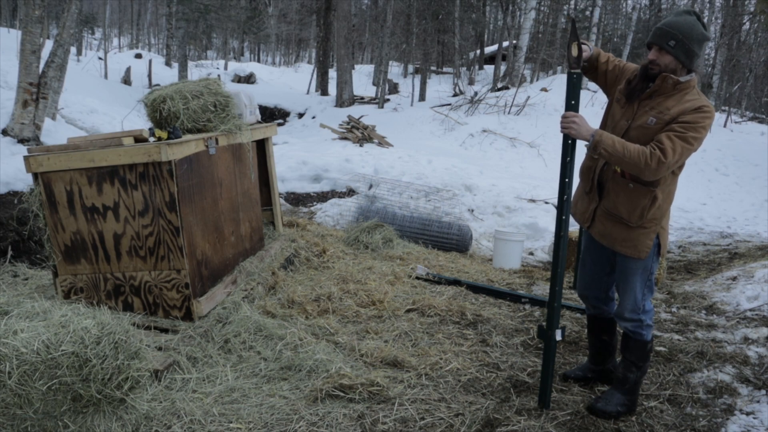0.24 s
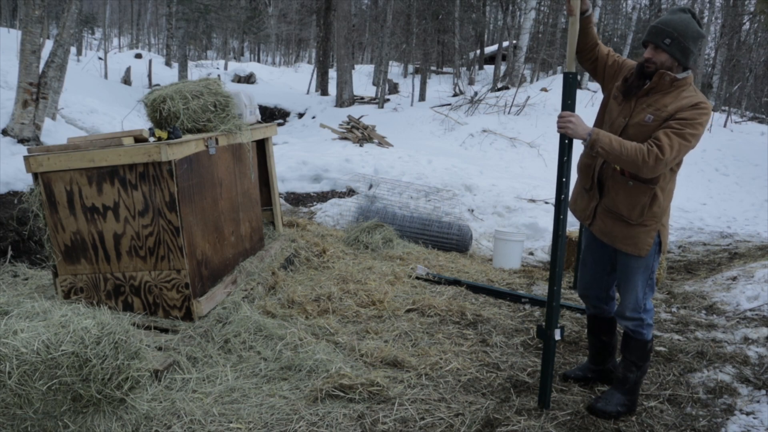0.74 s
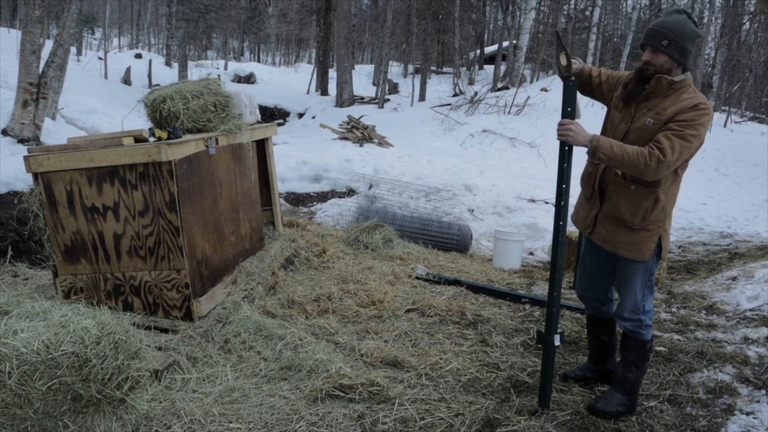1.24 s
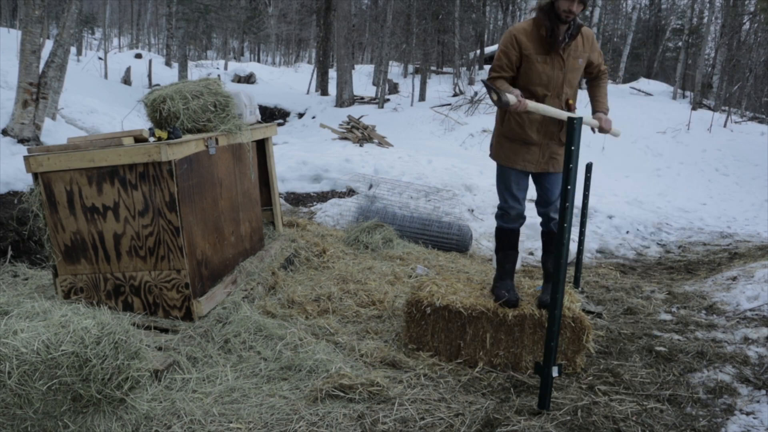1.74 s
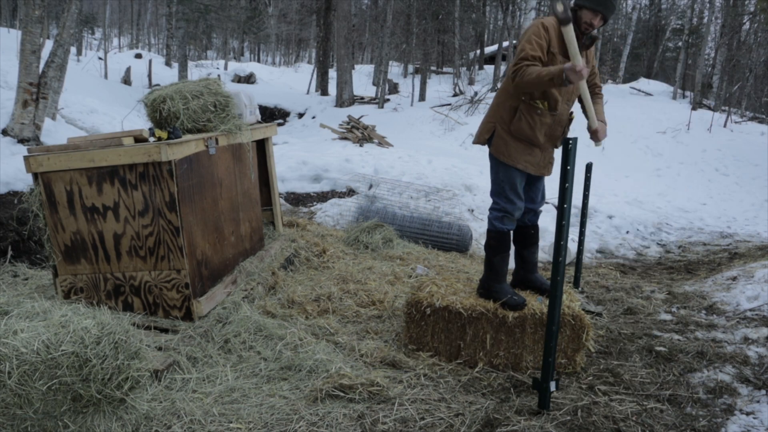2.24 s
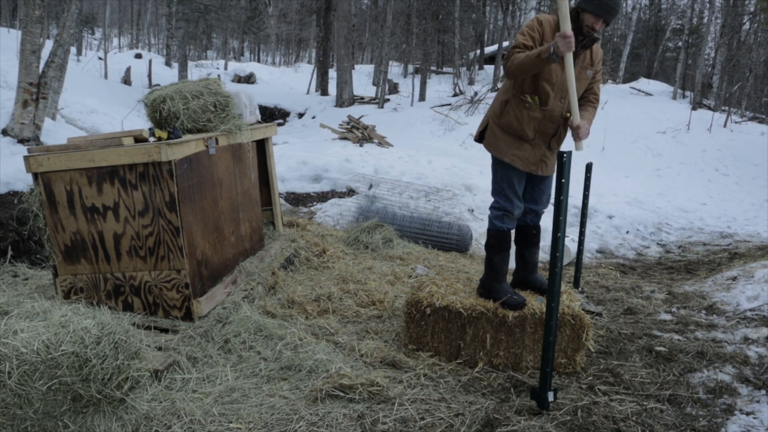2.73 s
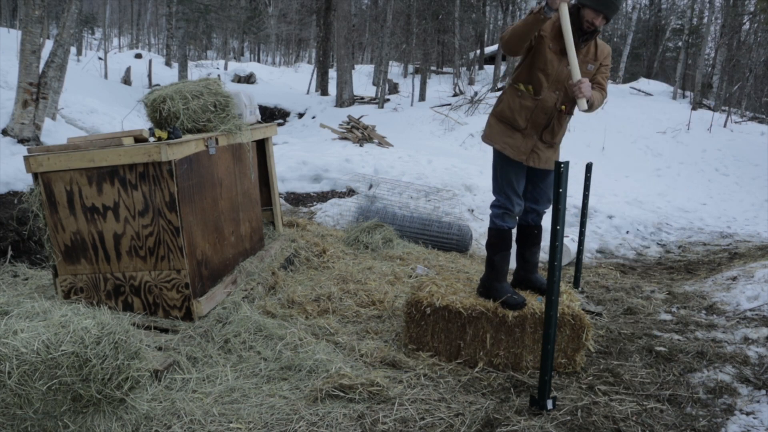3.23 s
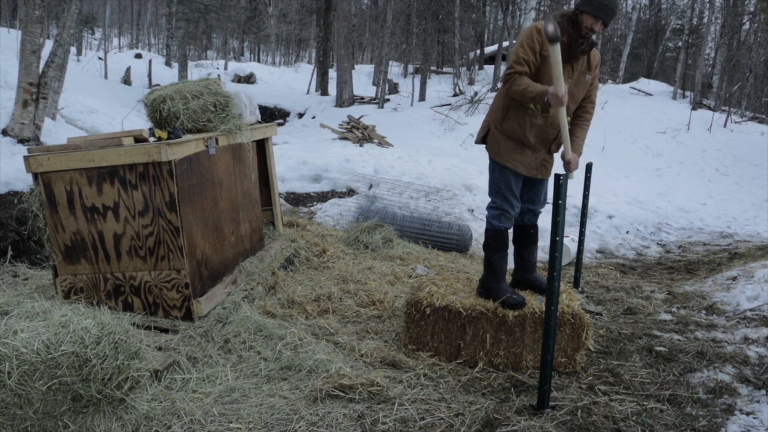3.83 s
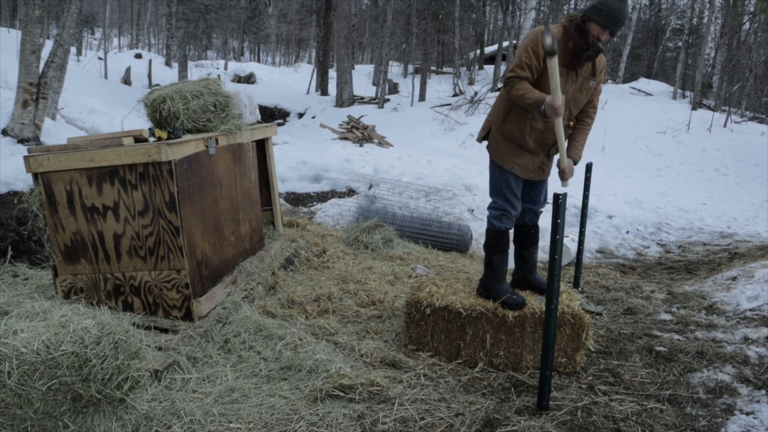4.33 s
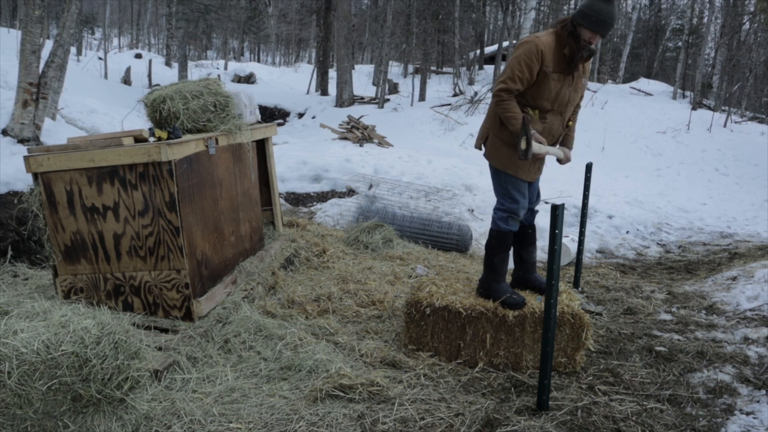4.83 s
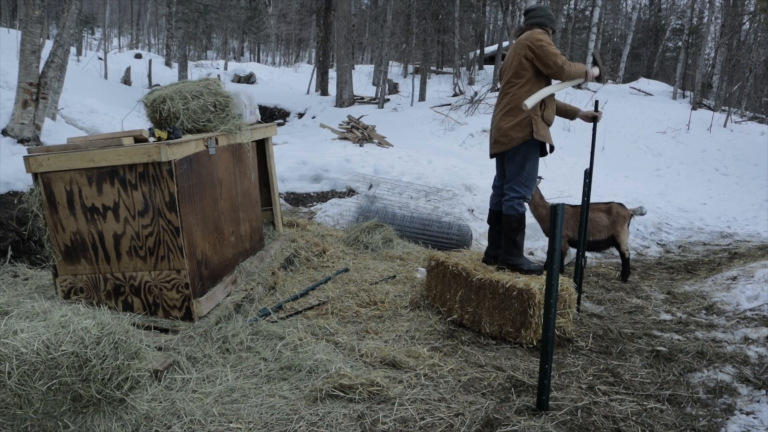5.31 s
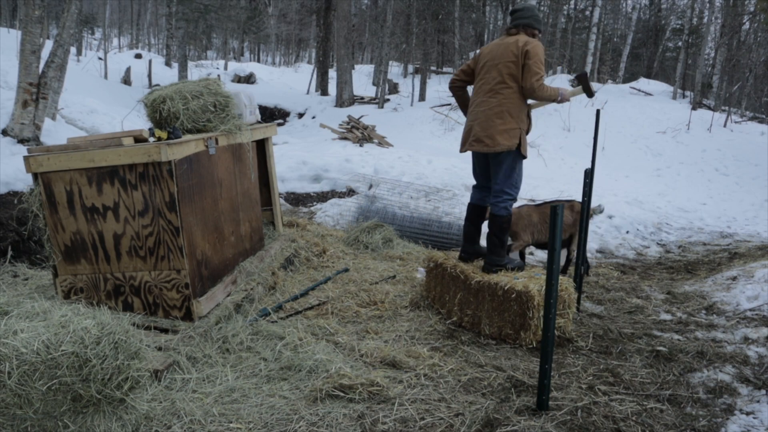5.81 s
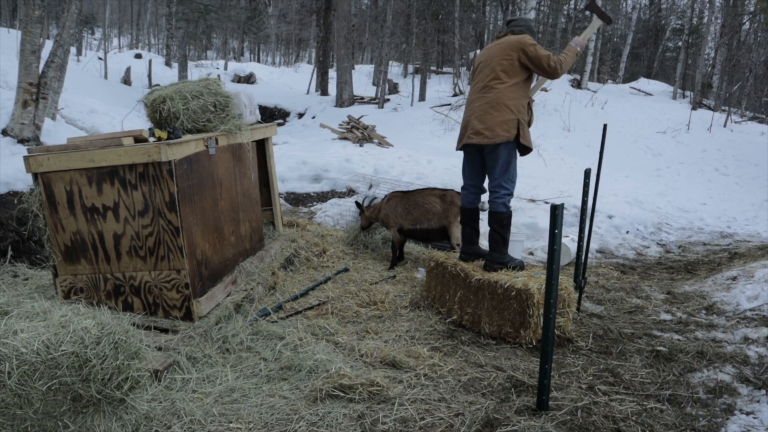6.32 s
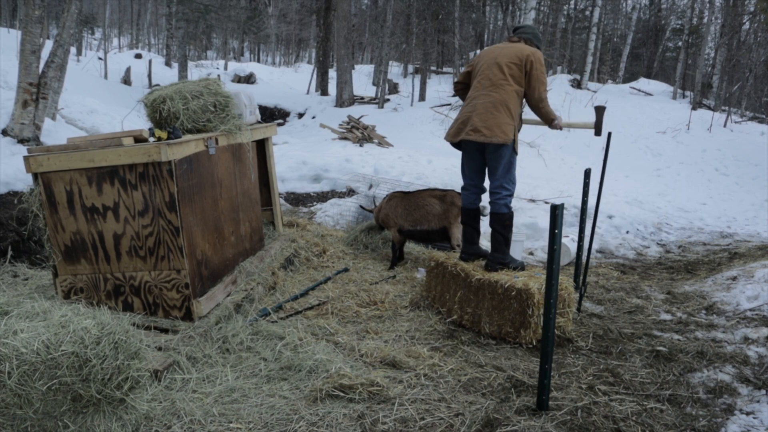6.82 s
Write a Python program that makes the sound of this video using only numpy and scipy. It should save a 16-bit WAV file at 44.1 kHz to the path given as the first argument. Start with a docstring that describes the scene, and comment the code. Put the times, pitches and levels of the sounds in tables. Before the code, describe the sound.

In a quiet pen by a forest, two near, sharp clangs of an axe on a steel post ring out about a second apart. A fast, even run of short, very high metallic clinks follows, like hammering at many times natural speed, first on a near post, then quieter on a more distant one. Boots and hooves scuff very faintly in straw over a soft hiss of air.

```python
"""A snowy pen at a forest edge, where an axe head drives steel fence posts into frozen ground.
Each blow is a crack of steel on steel, the ring of the post's modes and an echo from the trees.
Two near blows sound at natural speed; then time runs six times faster, so crack and ring come six
times higher and shorter, first on a near post, then on one further off.
Boots and hooves scuff in straw and clothing rustles over a quiet bed of air."""
import sys
import numpy as np
from scipy import signal
from scipy.fft import rfft, irfft
from scipy.io import wavfile
from scipy.ndimage import uniform_filter1d

SR = 44100
rng = np.random.default_rng(int(sys.argv[2]) if len(sys.argv) > 2 else 0)


def store_wav(level_fs):
    """Save 16-bit WAV to argv[1]."""
    pcm = np.round(np.clip(np.atleast_2d(level_fs), -1, 1) * 32767)
    wavfile.write(sys.argv[1], SR, pcm.T.astype(np.int16))


N = 311346

FAST_FROM_S, SPEED_UP = 1.41, 6
FAR_FROM_S, FAR_PITCH = 4.96, 0.9883
HUM_HZ, TOP_HZ = 1268.5, 16300
AFTER_RING_DB, AFTER_RING_STRETCH = -22, 2.8
THUD_DB, ECHO_STRETCH = (-13.5, 2, -17), (1.05, 0.66, 0.88)  # hand-held, near and far post

# Colour of the air bed, at natural speed and sped up: f/Hz, relative level/dB
AIR_COLOUR_SLOW = [(12, -32.5), (20, -8), (156, -11), (323, -12), (583, -13.5), (816, -18), (1280, -9.5),
                   (1740, -14.5), (9410, -24.5), (15200, -19), (16500, -37.5)]
AIR_COLOUR_FAST = [(20, -25), (60, -13.5), (130, -8.5), (400, -2), (800, -6), (1400, -2), (5000, -4),
                   (8000, 0.5), (10000, -8), (13000, -5), (16500, -19)]
# Fader curves for those two beds: t/s, level/dB
AIR_FADERS = [
    [(0, -75), (.116, -77), (.498, -71), (.966, -74.5), (1.4, -66)],
    [(1.4, -73.5), (1.76, -69), (2, -73), (2.83, -74), (4.88, -70.5), (5.2, -76), (5.7, -71.5), (6.35, -75),
     (7.06, -72)],
]
# Envelopes of the hand-held post's main ring: t/s, level/dB
HUM_ENVELOPES = [
    [(0, -76), (.05, -79.5)],
    [(.056, -35.5), (.066, -40.5), (.105, -35.5), (.122, -49), (.156, -43.5), (.204, -66), (.5, -73.5),
     (.92, -93.5)],
    [(.93, -33.5), (1.006, -27), (1.076, -37), (1.136, -65.5), (1.294, -77.5), (1.4, -72)],
]
# Crack and echo bands at natural speed: f/Hz, crack level/dB, crack t60 factor,
# echo level/dB, base echo t60/s
CRACK_BANDS = [(15, -29, 1.1, -3, .6), (38.4, -21.5, 1, -4, .6), (90, -14, 0.12, -1.5, 0.69),
               (180, -8, 0.72, 0, 0.31), (365, -15, 0.78, 2.5, 1), (673, -6, 0.87, -2.5, 0.62),
               (1200, -0.5, 0.92, -2.5, 0.95), (1760, -2.5, 0.8, -1.5, 1), (2555, -2.5, 1.3, 1.5, .8),
               (4400, -1.5, 1.1, -5.5, 0.94), (8200, -7, .9, 3.5, .48), (11500, -15.5, 0.75, 0.5, .5),
               (13800, -13.5, .9, -1, 0.25), (16400, -16.5, 0.72, -6.5, .3)]
# Axe hits: t/s, crack gain/dB, treble/dB, 4 x high ring level/dB (set by where the axe lands),
# t60/s of rings one and two, boost/dB of the two clinking middle rings on a glancing blow
HITS = [(0.0536, 0, 1, -35, -27, -34, -14.5, 0.17, -2), (0.928, -2.5, 4, -25, -27, -33, -17, 0.16, 1),
        (1.4313, -9.5, 6, -43.5, -31, -14.5, -36, 1, -4),
        (1.5667, -6, 1.5, -10, -18, -16.5, -24, 0.29, -0.5),
        (1.902, -9.5, 8, -31.5, -32, -16, -29, 0.39, -5.5),
        (2.061, -8.5, 5.5, -36, -37.5, -20, -33.5, 0.53, -1),
        (2.2091, -9, 8.5, -20.5, -27, -21, -32.5, 0.21, 19),
        (2.3698, -10.5, 10, -19.5, -39, -19, -21, 0.25, 2),
        (2.5272, -8, 5.5, -43.5, -44.5, -23.5, -36.5, 0.69, 3),
        (2.6789, -7, 2, -26.5, -44, -14.5, -31.5, .42, 13.5),
        (2.8339, -5.5, -.5, -24.5, -36, -13, -25, 0.44, 1.5),
        (2.995, -8, 7.5, -21.5, -42, -21.5, -25.5, .33, 12),
        (3.159, -5.5, 0, -21, -35, -25.5, -42, 0.35, 7.5),
        (3.3215, -3, -2.5, -25, -43, -23.5, -39, 0.39, 1),
        (3.4792, -4.5, 2.5, -39, -25.5, -16.5, -19.5, 0.5, -3.5),
        (3.6434, -0.5, -3.5, -38, -31, -18.5, -30, 0.46, -5.5),
        (3.8048, -1, -3, -39, -21.5, -32.5, -23, 0.43, 2), (3.9655, -2, -1, -41, -35, -59, -54.5, 0.35, 2),
        (4.1328, -3, -3.5, -28.5, -30.5, -19.5, -61, 0.31, -2),
        (4.2998, -2.5, -3.5, -35.5, -24, -45, -28, .23, 1),
        (4.468, 0.5, -12.5, -33, -22, -23, -39, 0.22, -6),
        (4.6336, -4.5, -2, -42, -32, -38.5, -59, 0.14, -3),
        (4.8052, -5.5, -2, -26.5, -40, -15, -39, 0.36, 5.5),
        (5.0406, -10.5, -6, -60, -38.5, -48.5, -51.5, .1, -4),
        (5.198, -10, -7, -45, -36, -52, -48, 0.11, -2), (5.3582, -10, -4, -48, -27, -50, -67.5, 0.087, 4),
        (5.5158, -7.5, -5.5, -48, -27, -47.5, -52, 0.12, 6), (5.665, -7, -6, -40, -28.5, -57, -48, 0.35, 0),
        (5.952, -16, 0.5, -41, -34.5, -25, -33.5, .65, -2),
        (6.0877, -13, 1, -33.5, -33.5, -20.5, -30.5, 0.41, 16),
        (6.2426, -12.5, 4, -40, -27, -28, -28, .34, -3), (6.3812, -13.5, 0, -36, -42.5, -33, -33, 0.25, -2),
        (6.5299, -14.5, -0.5, -35.5, -40, -28.5, -36, 0.27, -4),
        (6.6825, -12, -2.5, -30, -40, -45.5, -54, 0.27, 12),
        (6.8348, -9.5, -5.5, -29, -37.5, -21.5, -30, 0.32, 4),
        (6.996, -16, 3.5, -37.5, -29, -28, -35, .43, 9)]
# Tone of the crack as the posts sink: t/s, bass/dB, base t60/s at natural speed,
# echo/dB and weak modes/dB relative to the crack
CRACK_TONE = [(.05, -11, 0.11, -37, -35.5), (.93, -9, .11, -34.5, -29), (1.43, -10.5, 0.089, -29.5, -27.5),
              (2.05, -13, 0.14, -27.5, -25.5), (2.2, -13, 0.22, -29.5, -24), (2.4, -10.5, .13, -29.5, -28),
              (3.7, -8.5, 0.077, -34, -35.5), (4.82, -12.5, 0.078, -34, -35.5),
              (5.03, -9.5, 0.17, -35, -30.5), (5.68, -5, 0.14, -32.5, -29.5), (5.94, -5, .2, -26, -12),
              (6.5, 10, 0.12, -26, -32.5), (7, 8.5, 0.13, -28, -29)]
# Strong modes at natural speed (four high rings, four middle rings, the sway): f/Hz
STRONG_MODES_HZ = [1238.3, 1267, 1305, 1400.5, 509, 576, 731, 912, 35.4]
# Tone of the lesser rings: t/s, 4 x middle ring level/dB, sway level/dB, t60/s of rings three and four
RING_TONE = [(.05, -61, -46.5, -25, -39.5, -57.5, 0.12, 0.068),
             (.93, -44.5, -42, -49, -36.5, -55.5, .11, 0.091),
             (1.43, -61.5, -73, -59, -62.5, -77, 0.07, 0.24),
             (1.9, -50.5, -76.5, -56.5, -60.5, -70.5, 0.1, 0.27),
             (3, -73.5, -73, -60, -50.5, -60, 0.12, 0.23), (3.5, -78.5, -78, -62, -58, -59.5, 0.082, .07),
             (4.82, -79, -78.5, -62.5, -59.5, -62, .07, 0.029),
             (5.03, -85.5, -81, -67.5, -68, -74, .1, 0.18), (5.68, -80, -82, -68, -69, -68, .1, 0.12),
             (5.94, -65, -55.5, -58, -65, -78, .11, 0.078), (6.3, -73, -75, -60.5, -67, -63, 0.12, .11),
             (7, -74.5, -76, -56, -65, -60, 0.08, .1)]
# The buried end stiffens ring one as the near post sinks: t/s, rise in f/Hz at natural speed
STIFFENING = [(3.8, 0), (4.13, 1.5), (4.3, 4), (4.47, 7), (4.63, 14), (4.9, 14), (5, 0)]
# Weak modes at natural speed: f/Hz
WEAK_MODES_HZ = [1114, 1556, 1690, 1900, 2400, 2530, 3320, 3570, 4180, 4785, 5510, 6400, 6900]
# Their balance and decay: relative level/dB, t60/s at natural speed
WEAK_DECAYS = [(-15, 0.23), (0, 0.45), (-8, 0.49), (-8.5, 0.27), (-4.5, 0.12), (-15.5, 0.25), (-8.5, .3),
               (-10.5, 0.16), (-7, 0.39), (-6.5, 0.26), (-7, 0.23), (-4.5, 0.23), (-13.5, 0.24)]
# Boots and hooves in straw: t/s, level/dB, centre f/Hz, t60/s
FOOT_SCUFFS = [(1.216, -61, 510, 0.089), (1.235, -59, 554, 0.15), (1.675, -56, 2980, .024),
               (1.69, -47, 3860, 0.03), (1.722, -54, 3490, .026), (1.754, -56.5, 13170, 0.087),
               (1.759, -60, 4000, .031), (1.782, -64.5, 9000, 0.041), (2.235, -54.5, 4120, .027),
               (3.581, -60.5, 1820, .014), (3.9, -62.5, 400, .037), (4.549, -60, 6000, 0.0085),
               (4.795, -61.5, 2000, .023), (4.977, -50, 2980, 0.015), (5.024, -57, 5000, 0.021),
               (5.286, -60.5, 3900, .052), (5.6, -59, 3020, .037), (5.825, -65, 775, .093),
               (5.913, -60.5, 6940, .029), (6.584, -62, 1800, .02), (6.806, -59, 2856, .022)]
# The axe bounces and lands again: t/s, crack gain/dB
REBOUNDS = [(2.235, -35.5), (4.481, -24), (4.822, -30)]
# Brief dips before the speed-up and the far post: start t/s, stop t/s, gain/dB
DIPS = [(1.398, 1.42, -14), (4.9225, 4.924, -25), (4.9315, 4.935, -30), (4.9405, 4.9455, -30),
        (4.9495, 4.956, -30), (4.958, 4.966, -36)]


def gain_of(db):
    """dB to gain."""
    return 10 ** (np.asarray(db) / 20)


def unit_rms(x):
    """Scales to rms 1."""
    return x / np.sqrt(np.mean(x ** 2) + 1e-20)


def coloured_noise(size, points_hz, levels_db):
    """Noise of rms 1 with an EQ curve drawn over log frequency."""
    hz = np.fft.rfftfreq(size, 1 / SR)
    eq_db = np.interp(np.log(hz + 1), np.log(points_hz), levels_db)
    return unit_rms(irfft(rfft(rng.standard_normal(size)) * gain_of(eq_db), size))


def wobble(size, span):
    """Random drift of rms 1, smoothed twice over span samples."""
    return unit_rms(uniform_filter1d(uniform_filter1d(rng.standard_normal(size), span), span))


def read_at(rows, s):
    """Interpolates every column of a table at time s."""
    when, *columns = np.transpose(rows)
    return [np.interp(s, when, column) for column in columns]


def add(mix, s, sound):
    """Mixes a sound in at time s."""
    part = mix[round(s * SR):][:len(sound)]
    part += sound[:len(part)]


def air():
    """A bed of forest air and hiss, with a slight flutter."""
    t, out = np.arange(N) / SR, np.zeros(N)
    fast = t >= FAST_FROM_S
    for colour, fader, gate in zip((AIR_COLOUR_SLOW, AIR_COLOUR_FAST), AIR_FADERS, (~fast, fast)):
        out += gate * coloured_noise(N, *np.transpose(colour)) * gain_of(read_at(fader, t)[0])
    flutter_db = 0.5 * unit_rms(uniform_filter1d(rng.standard_normal(N), 600))
    return out * gain_of(flutter_db)


def post_hum():
    """The long ring of the hand-held post: one sine that swells and is stifled."""
    out = np.zeros(N)
    for envelope in HUM_ENVELOPES:
        s, db = np.transpose(envelope)
        t = np.arange(s[0], s[-1], 1 / SR)
        tone = np.sqrt(2) * np.sin(2 * np.pi * HUM_HZ * (t - s[0]))
        add(out, s[0], gain_of(np.interp(t, s, db)) * tone)
    return out


def crack(speed, thud_db, bass_db, treble_db, t60, echo_db, echo_stretch):
    """Noise in overlapping bands: a quick clatter of steel on steel, then a tail from the trees."""
    size = 2 ** 15 if speed == 1 else 2 ** 13
    t = np.arange(size) / SR * speed
    spectrum = rfft(rng.standard_normal(size))
    log_hz = np.log(np.fft.rfftfreq(size, 1 / SR) / speed + 1)
    contact = gain_of(-6 / (1 + np.exp(-(t - 0.022) / 0.011)))  # drops as the axe leaves the post
    contact *= 1 + 0.27 * np.exp(-t / 0.005)  # the first touch is the hardest
    # each blow meets the steel elsewhere and gets its own colour
    eq_points = np.linspace(np.log(60), np.log(16000), num=48)
    spectrum *= gain_of(2.8 * np.interp(log_hz, eq_points, rng.standard_normal(48)))
    centres, out = np.log(np.array(CRACK_BANDS)[:, 0]), np.zeros(size)
    for k, (hz, db, stretch, tail_db, tail_t60) in enumerate(CRACK_BANDS):
        band = irfft(spectrum * np.interp(log_hz, centres, np.arange(len(centres)) == k), size)
        eq_db = np.interp(np.log2(hz), np.log2([40, 80, 150, 300, 1100, 2000]),
                          [thud_db, bass_db, bass_db, 0, 0, treble_db])
        clatter = contact * gain_of(-60 * t / (stretch * t60))
        tail = gain_of(echo_db + tail_db - 60 * t / (tail_t60 * echo_stretch))
        tail *= 1 - np.exp(-t / 0.028)
        out += band * gain_of(db + eq_db + 1.3 * rng.standard_normal()) * (clatter + tail)
    attack = 1 - np.exp(-(t / 0.00083) ** 2)
    low_cut = signal.butter(2, 18 * speed, "high", fs=SR, output="sos")
    return signal.sosfilt(low_cut, out * attack)


def ring(t, hz, db, t60):
    """Decaying sines, one per mode, with random phase."""
    hz, db, t60 = (np.asarray(v, float)[:, None] for v in (hz, db, t60))
    sines = np.sin(2 * np.pi * (hz * t + rng.random(hz.shape)))
    return ((hz < TOP_HZ) * gain_of(db - 60 * t / t60) * sines).sum(0)


def weak_modes(t, speed, pitch, db):
    """Metallic shimmer: where the axe lands decides which weak modes speak."""
    hz = np.array(WEAK_MODES_HZ)
    balance_db, t60 = np.transpose(WEAK_DECAYS)
    balance_db = balance_db + 1.8 * rng.standard_normal(len(hz))
    if speed == 1:
        balance_db -= 7 * (hz < 2000)  # the hand on the post stifles the low ones
    modes = ring(t, pitch * hz, db + balance_db, t60 / speed)
    # a crowd of brief modes, new at each blow
    spread, softness, life = rng.random((3, 32))
    modes += ring(t, speed * 450 * 6 ** spread, db - 9 - 14 * softness, (0.086 + 0.3 * life ** 2) / speed)
    return modes * (1 + 0.45 * wobble(len(t), 400 // speed))  # close partners and echoes blur them


def axe_blows():
    """Each blow cracks and sets the post ringing; the next blow chokes the old ring."""
    out, ends = np.zeros(N), [hit[0] for hit in HITS[1:]] + [N / SR]
    for (s, db, treble_db, *high_db, ring_t60, clink_db), end in zip(HITS, ends):
        bass_db, t60, echo_db, weak_db = read_at(CRACK_TONE, s)
        *middle_db, sway_db, third_t60, fourth_t60 = read_at(RING_TONE, s)
        middle_db = middle_db + clink_db * np.array([0, 0, 1, 1]) + 1.5 * rng.standard_normal(4)
        fast, far = s > FAST_FROM_S, s > FAR_FROM_S
        post = int(fast) + int(far)
        speed = SPEED_UP if fast else 1
        pitch = speed * (FAR_PITCH if far else 1)
        impact = crack(speed, THUD_DB[post], bass_db, treble_db, t60, echo_db, ECHO_STRETCH[post])
        add(out, s, gain_of(db) * impact)

        end = min(end, s + 0.84, end if far else FAR_FROM_S)  # the near ring stops at the far post's cue
        t = np.arange(round((end - s) * SR)) / SR
        hz = pitch * np.array(STRONG_MODES_HZ[:-1])
        hz[0] += speed * read_at(STIFFENING, s)[0]
        decays = [ring_t60, ring_t60, third_t60, fourth_t60, 0.2, 0.25, 0.09, 0.09]
        body = ring(t, hz, [*high_db, *middle_db], decays)
        body += ring(t, hz[:2], np.add(high_db[:2], AFTER_RING_DB), [AFTER_RING_STRETCH * ring_t60] * 2)
        # a partner below the sixth ring, and the hollow knock of the ground
        knock_db = db + bass_db - 35.5
        body += ring(t, [pitch * 447, speed * 97], [middle_db[1] - 4, knock_db], [0.2, 0.16 / speed])
        if s > 6:  # once let go, the far post also hums faintly
            body += ring(t, [pitch * 210], [-72], [0.4])
        grip = 1 + 0.55 * wobble(len(t), 100)  # the ground's grip roughens the sway of the post
        body += grip * ring(t, [speed * STRONG_MODES_HZ[-1]], [sway_db], [0.24])
        body += weak_modes(t, speed, pitch, db + weak_db)
        attack = 1 - np.exp(-t * speed / 0.0015)
        add(out, s, body * attack)
    return out


def rustle():
    """Straw and clothing whisper in scattered grains from 1.2 s on."""
    out, t = np.zeros(N), np.arange(1024) / SR
    envelope = np.sin(np.pi * t / t[-1]) ** 2 * gain_of(-60 * t / 0.04)
    for when, softness, height in rng.random((90, 3)):
        grain = coloured_noise(len(t), 900 * 9 ** height * np.array([0.4, 1, 2.5]), [-24, 0, -20])
        add(out, 1.2 + 8.3 * when, gain_of(-65.5 - 10 * softness) * grain * envelope)
    return out


def scuffs():
    """Boots and hooves brush the straw: short puffs of noise around a centre pitch."""
    out, t = np.zeros(N), np.arange(4096) / SR
    attack = 1 - np.exp(-t / 0.00039)
    for s, db, hz, t60 in FOOT_SCUFFS:
        puff = coloured_noise(len(t), hz * np.array([0.3, 1, 3]), [-26, 0, -20])
        add(out, s, gain_of(db - 60 * t / t60) * puff * attack)
    return out


def axe_bounces():
    """The axe head rebounds and lands again with a short, dry crack."""
    out = np.zeros(N)
    for s, db in REBOUNDS:
        tick = crack(SPEED_UP, thud_db=-21, bass_db=6, treble_db=-1,
                     t60=0.13, echo_db=-44, echo_stretch=0.6)
        add(out, s, gain_of(db) * tick)
    return out


def scene():
    """Mono mix: axe and post up front, straw and air behind."""
    return (axe_blows() + axe_bounces() + post_hum() + scuffs() + rustle() + air())[None]


def record(dry):
    """Master chain: brief dips, a softened top octave, clipping on the near blows, a high cut."""
    t, fader_db = np.arange(N) / SR, np.zeros(N)
    for start, stop, db in DIPS:
        fader_db[(t > start) & (t < stop)] = db
    dipped = dry * uniform_filter1d(gain_of(fader_db), size=30)
    softened = dipped + 0.14 * np.roll(dipped, 1, axis=1)
    clipped = np.clip(softened, -0.97, 0.97)
    high_cut = signal.firwin(255, TOP_HZ, window=("kaiser", 9), fs=SR)
    return signal.oaconvolve(clipped, high_cut[None], "same")


dry = scene()
out = record(dry)
store_wav(out)
```